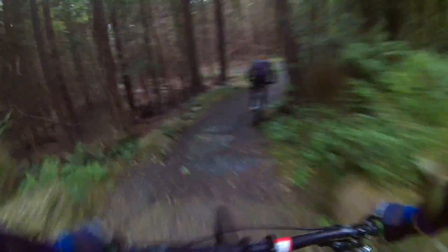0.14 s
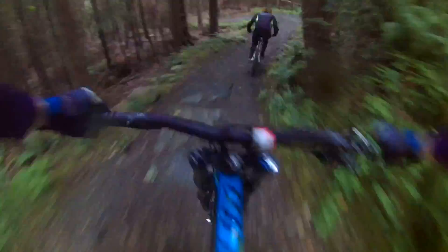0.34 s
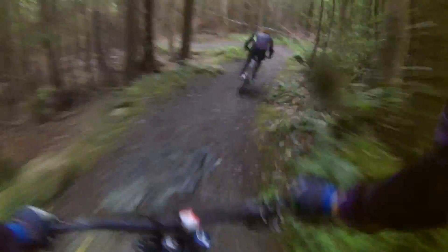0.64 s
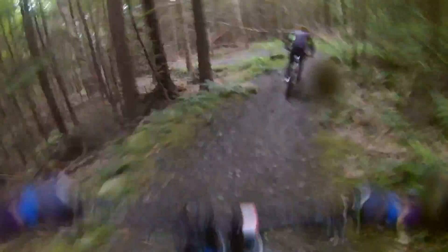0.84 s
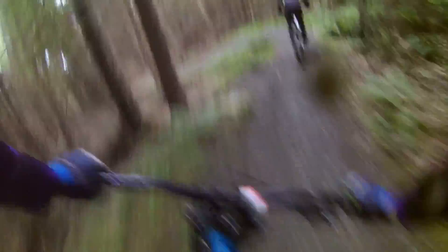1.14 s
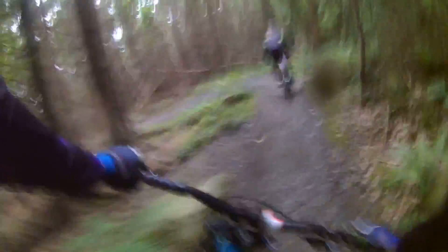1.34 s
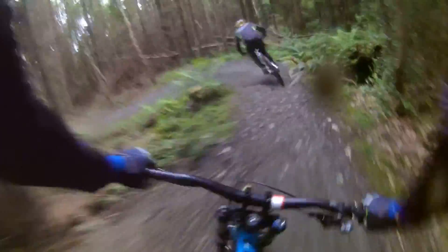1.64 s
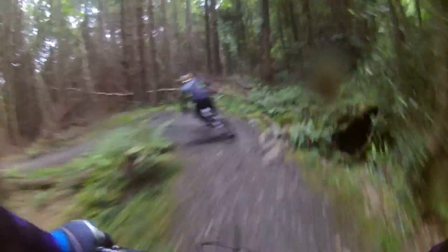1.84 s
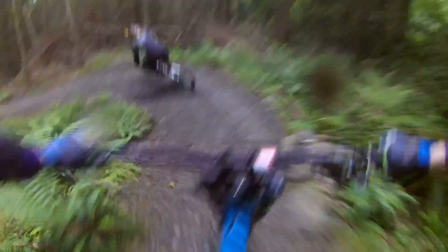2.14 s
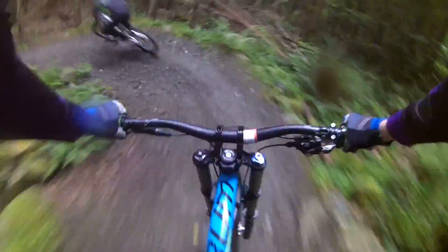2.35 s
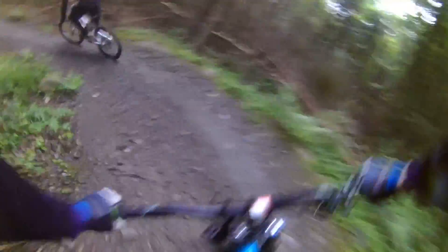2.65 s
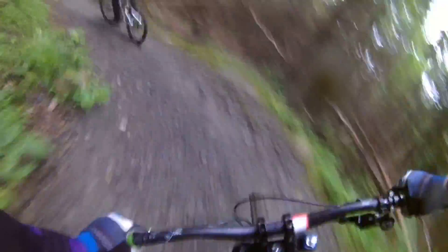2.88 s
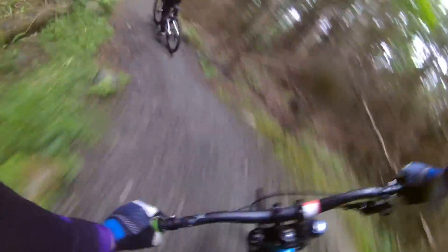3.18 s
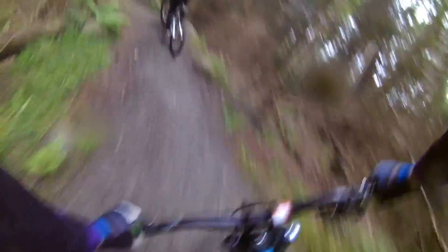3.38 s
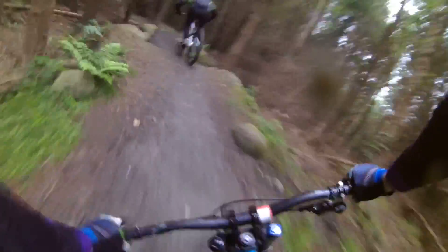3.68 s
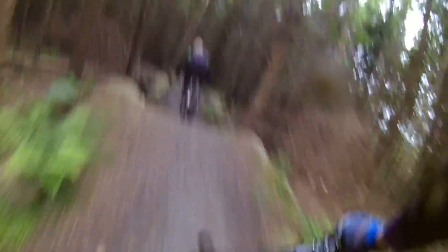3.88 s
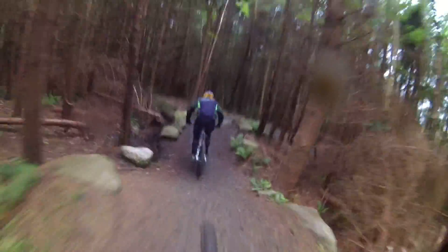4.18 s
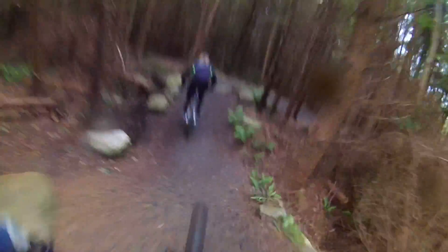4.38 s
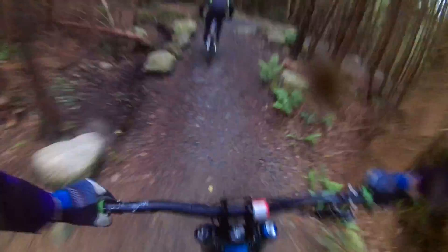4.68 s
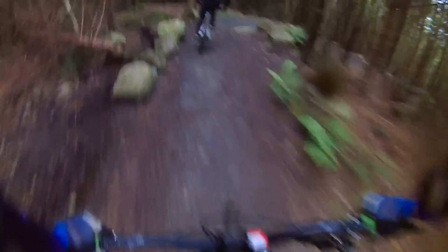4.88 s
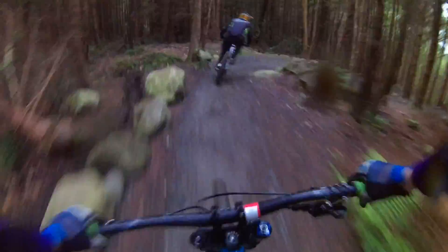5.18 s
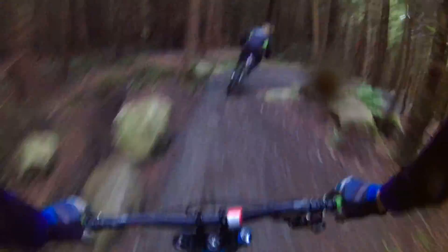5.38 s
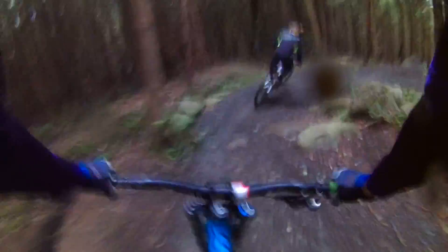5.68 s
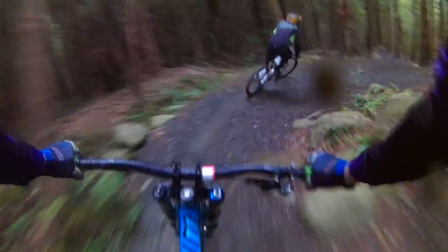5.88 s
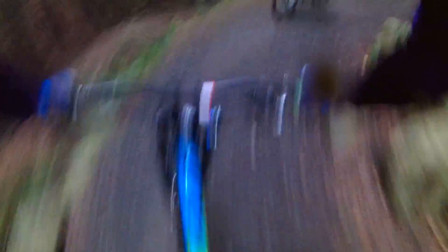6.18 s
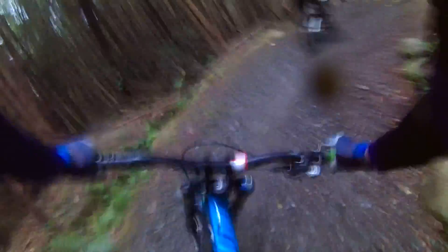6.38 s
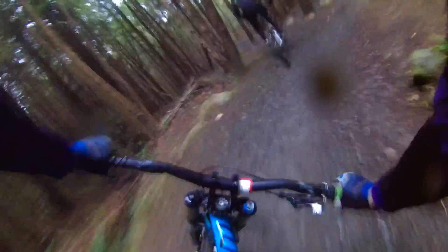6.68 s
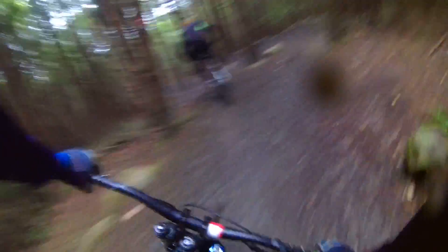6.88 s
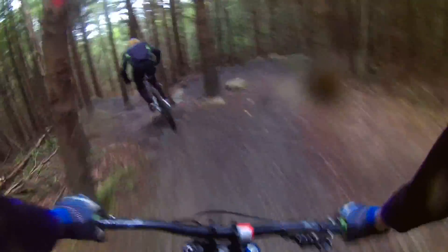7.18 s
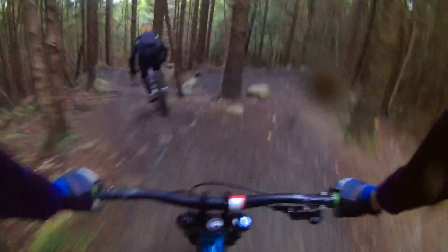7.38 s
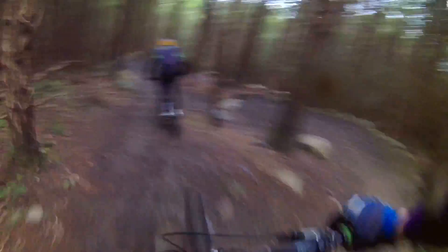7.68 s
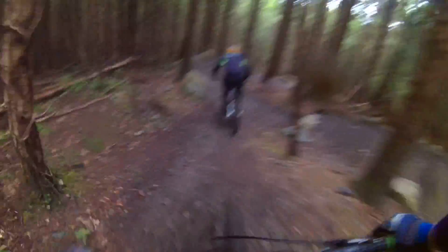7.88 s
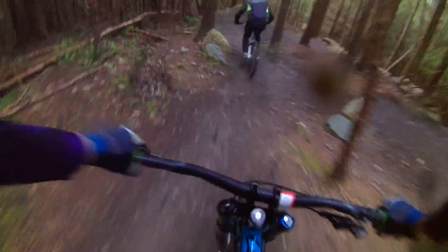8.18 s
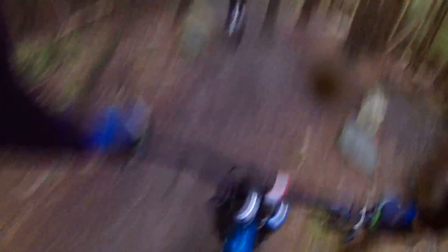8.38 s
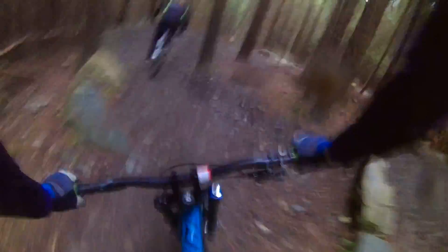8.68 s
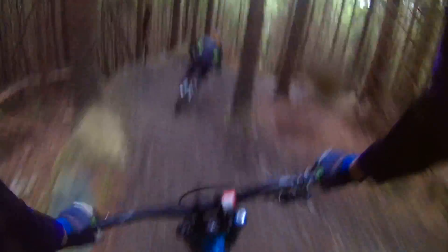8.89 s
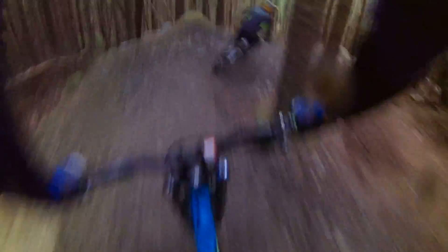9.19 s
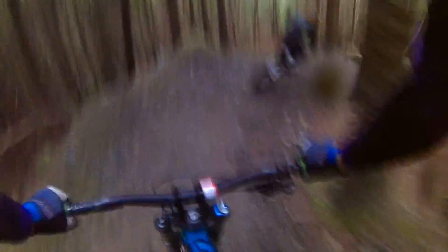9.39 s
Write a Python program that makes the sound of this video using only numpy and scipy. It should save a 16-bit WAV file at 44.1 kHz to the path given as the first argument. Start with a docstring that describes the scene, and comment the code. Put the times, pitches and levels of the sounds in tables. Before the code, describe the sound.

A mountain bike rattles down a rough woodland trail, with a huge early thump, clustered plastic knocks, low shaking rumble and muffled gritty tyre roar.

```python
"""A camera in a closed plastic housing rides on a mountain biker's chest down a rough woodland trail.
A short calm start breaks at 0.5 s in the hardest thump; knocks crowd up to 1.5 s, then thin out.
A second rough patch comes near 6 s, lone bumps after 8 s and a rattle of knocks at the end.
Throughout, filtered noise makes the rumble of shaking and a treble hiss that spits in short bursts, and
random grains make the tyre roar. The housing's resonances colour roar and knocks; sines add faint whines."""
import sys
import numpy as np
from scipy import signal
from scipy.fft import rfft, irfft, next_fast_len
from scipy.io import wavfile

SR = 44100
rng = np.random.default_rng(int(sys.argv[2]) if len(sys.argv) > 2 else 0)


def dump(signal):
    """Clip the signal to [-1, 1] and save it as 16-bit WAV at the path in sys.argv[1]."""
    limited = np.clip(np.atleast_2d(signal).T, -1, 1)
    pcm = np.round(limited * 32767).astype(np.int16)
    wavfile.write(sys.argv[1], SR, pcm)


N = 420846   # samples, about 9.5 s

# Resonances of the plastic housing: pitch_hz, width_hz (each source scales it), level_db
HOUSING_MODES = [(524, 510, -11.5), (904, 730, -11.5), (1241, 272, -4), (1487, 233, -5), (1880, 372, -6),
                 (2070, 1110, -16), (3000, 990, -21.5), (3733, 540, -7.5), (4730, 2600, -19.5),
                 (6400, 5000, -23), (11000, 2800, -35)]
RING_FROM_HZ, CRACK_FROM_HZ = 3200, 4500   # resonances below are "body", between "ring", above "crack"


def amp(db):
    """Decibels to gain."""
    return 10 ** (np.asarray(db) / 20)


def rms_one(x):
    """Scale to unit rms."""
    return x / np.sqrt(np.mean(x ** 2) + 1e-20)


def drift(rate_hz):
    """Slow random wandering, spread about 1: noise passed twice through a one-pole low-pass."""
    # made at an eighth of the sample rate; the first 8000 values let the filter settle
    r = np.exp(-16 * np.pi * rate_hz / SR)
    noise = rng.standard_normal(N // 8 + 8002)
    slow = signal.lfilter([1], [1, -2 * r, r * r], noise)[8000:]
    slow = rms_one(slow - slow.mean())
    return np.interp(np.arange(N) / 8, np.arange(len(slow)), slow)


def coloured(spectrum):
    """Noise shaped to the given (Hz, dB per Hz) curve, rms 1."""
    hz, db = np.transpose(spectrum)
    size = next_fast_len(N)
    grid_hz = np.maximum(np.arange(size // 2 + 1) * SR / size, 1)
    shape = amp(np.interp(np.log(grid_hz), np.log(hz), db, left=-120, right=-120))
    noise = irfft(rfft(rng.standard_normal(size)) * shape, size)
    return rms_one(noise[:N])


def resonate(x, hz, width_hz):
    """One resonance with gain 1 at its top: a two-pole filter that rings at its pitch."""
    r = np.exp(-np.pi * width_hz / SR)
    feed = np.array([1, 0, -1]) * (1 - r * r) / 2
    return signal.lfilter(feed, [1, -2 * r * np.cos(2 * np.pi * hz / SR), r * r], x)


def grains(per_s, spread_db):
    """Clicks at random moments, of uneven size and random sign."""
    sizes = amp(spread_db * np.minimum(rng.exponential(1, N), 4)) * rng.choice([-1, 1], N)
    return sizes * (rng.random(N) < per_s / SR)


def whines():
    """Faint tones of the electronics: sine waves whose pitch wavers a little."""
    # columns: pitch_hz, level_db (rms)
    whine_tones = [(13265, -88), (13348, -90), (14103, -90)]
    total = np.zeros(N)
    for hz, db in whine_tones:
        phase = 2 * np.pi * np.cumsum(hz + 7.5 * drift(23)) / SR
        total += amp(db) * np.sqrt(2) * np.sin(phase)
    return total


def hiss(level_db):
    """A treble noise floor with clumped bursts a few milliseconds long, some reaching lower than others."""
    # Colour of the hiss: pitch_hz, level_db (per Hz, shape only)
    hiss_spectrum = [(2650, -36), (4500, 1.5), (5740, -5.5), (6520, -5.5), (11300, -3), (15200, -2),
                     (16000, -8)]
    out = 0.46 * coloured(hiss_spectrum)
    clumps = amp(2.1 * drift(13.0))
    r = np.exp(-1 / (0.0012 * SR))   # each burst peaks after about 1.2 ms
    for edge_hz in (4000, 8000, 11500):
        starts = np.abs(grains(45 * clumps, 3.4))
        # the last factors give a burst the height of its start
        bursts = signal.lfilter([1], [1, -2 * r, r * r], starts + 1e-18) * (1 - r) * np.e
        high_pass = signal.butter(2, edge_hz, "high", fs=SR, output="sos")
        bright = signal.sosfilt(high_pass, coloured(hiss_spectrum))
        out = out + np.tanh(.5 * bursts) * 2.15 * bright   # tanh limits the largest bursts
    return amp(level_db) * rms_one(out)


def lurches(follows):
    """Power of the body's lurches over rough ground: each swells and sinks as a raised cosine."""
    # columns: middle_s, shaking_db (before follows narrows the spread), half_length_s
    lurch_rows = [(0.44, -29.5, 0.07), (0.515, -23.5, 0.061), (0.655, -22.5, 0.065), (0.758, -29, 0.12),
                  (0.874, -36.5, 0.055), (1.035, -41, 0.064), (1.146, -39.5, 0.11), (1.804, -47, 0.076),
                  (2.074, -45.5, 0.072), (2.41, -46, 0.08), (2.564, -41.5, .08), (2.874, -45, .1),
                  (3.165, -50, 0.059), (3.357, -46, 0.064), (3.694, -50, 0.088), (4.668, -46.5, 0.14),
                  (4.92, -46, 0.17), (5.197, -46, 0.13), (5.587, -38.5, 0.047), (5.926, -40, .08),
                  (6.0, -34.5, 0.094), (6.113, -34, 0.15), (6.24, -40.5, 0.19), (6.44, -44, 0.088),
                  (7.12, -50, 0.15), (7.405, -45.5, 0.12), (7.907, -47.5, 0.094), (8.3, -44, 0.083),
                  (8.587, -46, 0.079), (8.997, -39.5, 0.085), (9.17, -56, 0.11)]
    power = np.zeros(N)
    top_db = max(db for s, db, half_s in lurch_rows)
    for s, db, half_s in lurch_rows:
        first = max(round((s - half_s) * SR), 0)
        at = np.arange(first, min(round((s + half_s) * SR), N))
        swell = np.cos(np.pi / 2 * (at / SR - s) / half_s) ** 2
        # follows is the share of the level differences between lurches that is passed on
        power[at] += (amp(top_db + follows * (db - top_db)) * swell) ** 2
    return power


def rumble(shake_db, chest_db):
    """Low noise of the shaking mount and of strap and chest; shared lumps make both swell together."""
    # Colour of the slow shaking: pitch_hz, level_db (per Hz, shape only)
    shake_spectrum = [(7.1, -46), (12, 11.5), (54, 0), (130, -7.5), (170, -20), (290, -120)]
    # Colour of the strap and chest rumble: pitch_hz, level_db (per Hz, shape only)
    chest_spectrum = [(41, -60), (70, -21), (134, -4.5), (197, -1.5), (285, -9), (600, -19), (780, -42),
                      (1320, -120)]
    lumps = drift(4.3)
    shake = rms_one(coloured(shake_spectrum) * amp(1.74 * lumps + 1.5 * drift(11)))
    chest = rms_one(coloured(chest_spectrum) * amp(0.78 * lumps + 2.0 * drift(32)))
    return amp(shake_db) * shake + amp(chest_db) * chest


def tyres(roar_db, ring_db):
    """Tyre knobs and gravel: lumpy dense grains drive housing modes that each waver on their own."""
    lumps = amp(1.3 * drift(14.7) + 1.0 * drift(42))
    stones = grains(40, 2.84) * amp(5.5)   # lone stones tick over the dense grit
    grit_streams = [grains(3500, 1.6) * lumps + stones for stream in range(2)]
    low, high = np.zeros(N), np.zeros(N)
    for k, (hz, width_hz, db) in enumerate(HOUSING_MODES):
        mode = resonate(grit_streams[k % 2], hz, width_hz)   # two streams of grit alternate over the modes
        mode = resonate(mode, hz, 1.19 * width_hz)
        heard = amp(db + 2.24 * drift(33)) * mode * (-1) ** (k // 2)
        if hz < RING_FROM_HZ:
            low += heard
        else:
            high += heard
    return amp(roar_db) * rms_one(low) + amp(ring_db) * rms_one(high)


def small_knocks(roar_db):
    """Rows for knocks() at random moments; their peaks follow the tyre roar, so rough ground is louder."""
    per_s, most = 3.2, 60
    over_roar_db, spread_db = 6.5, 3   # peak against the tyre roar
    when, high = rng.random((most, 2)).T
    size, ring, crack, chatter = rng.standard_normal((most, 4)).T
    at = (when * N).astype(int)
    peak_db = roar_db[at] + over_roar_db + spread_db * size
    body_hz = 1100 * 2.45 ** high
    ring_db, crack_db = -14.5 + 9 * ring, -20.5 + 5 * crack
    length_s, chatter_db = np.full(most, 0.0089), 4.0 + 5 * chatter
    rows = np.transpose([at / SR, peak_db, body_hz, ring_db, crack_db, length_s, chatter_db])
    return list(rows[:int(np.clip(per_s * N / SR, 0, most))])


def knocks(rows):
    """Each knock is a click and a short chatter; where it lands decides which resonances answer."""
    out, t = np.zeros(N + 4096), np.arange(4096) / SR
    for s, peak_db, body_hz, ring_db, crack_db, length_s, chatter_db in rows:
        # fall per octave away from the body pitch: duller knocks are more pitched
        focus_db = min(-3.5 + 0.39 * ring_db, 0)
        fade = np.exp(-(t / np.clip(length_s, .0005, .04)) ** 0.96)
        chatter = rng.standard_normal(t.size) * fade * np.tanh(t / 0.0039)
        blow = amp(chatter_db) * chatter / np.linalg.norm(chatter)   # energy against that of the click
        blow[0] = 1   # the click
        whim_db = rng.normal(0, 1.0, len(HOUSING_MODES))   # each mode answers a little differently
        parts = np.zeros((3, t.size))   # body, ring, crack
        for k, (hz, width_hz, db) in enumerate(HOUSING_MODES):
            mode = amp(db + whim_db[k]) * (-1) ** k * resonate(blow, hz, width_hz)
            mode = resonate(mode, hz, 0.85 * width_hz)   # a second pass makes steep skirts
            if hz < RING_FROM_HZ:
                parts[0] += amp(focus_db * abs(np.log2(hz / body_hz))) * mode
            elif hz < CRACK_FROM_HZ:
                parts[1] += mode
            else:
                parts[2] += mode
        # bring the parts to equal energy, then mix them at their levels
        knock = amp([0, ring_db, crack_db]) / np.linalg.norm(parts, axis=1) @ parts
        at = round(s * SR)
        out[at:at + t.size] += amp(peak_db) * knock / np.abs(knock).max()
    return out[:N]


def thumps():
    """A bump shoves the microphone: a rounded push, then both mount modes swing out, heavily damped."""
    # Bumps through the mount: start_s, peak_db, quick_db (quick mode against slow mode),
    # t60_s (base time of a 60 dB fade; the slow mode fades faster, the quick one slower)
    bump_rows = [(0.429, -29, -1, 0.087), (0.5, -7, -9.5, 0.071), (0.601, -28.5, 9, 0.045),
                 (0.643, -30, 1, 0.062), (0.676, -13.5, -13, 0.041), (0.75, -30, 6, 0.057),
                 (0.764, -25.5, 6, 0.093), (0.854, -22.5, 6, 0.027), (1.16, -31.5, 5, 0.036),
                 (1.227, -32, 12, 0.021), (1.511, -36.5, 13, 0.057), (2.078, -35, -30, 0.047),
                 (2.407, -38.5, -7, 0.035), (2.483, -46, -5, 0.065), (2.616, -22, -0.5, 0.077),
                 (3.341, -37, -17, 0.08), (3.525, -28, -9.5, 0.08), (3.968, -40.5, -15, 0.082),
                 (4.969, -36.5, -11, 0.084), (5.91, -33, -23, 0.11), (5.979, -22, 9, 0.018),
                 (5.993, -34, -15, 0.035), (6.114, -22.5, -5.5, 0.045), (6.166, -40, -4, 0.038),
                 (6.285, -36.5, 8, 0.13), (6.415, -35, 4, 0.036), (6.685, -41, 1, 0.045),
                 (6.754, -44, -14, 0.04), (6.804, -41, -24, 0.064), (7.375, -50, -15, 0.03),
                 (7.608, -34, -16, 0.0098), (7.848, -34.5, -5, 0.038), (8.194, -33.5, -3, 0.02),
                 (8.282, -44, 4, 0.039), (8.413, -21, 1, 0.037), (8.806, -28.5, 9, 0.024),
                 (8.986, -17.5, -8.5, 0.044), (9.127, -31.5, -6, 0.031)]
    slow_hz, quick_hz = 67.4, 183   # the two modes of the mount
    out, t = np.zeros(N + 4096), np.arange(4096) / SR
    slow = np.cos(2 * np.pi * slow_hz * t - .8)
    quick = np.sin(2 * np.pi * quick_hz * t)
    # the lowest housing mode answers
    answer = amp(-16.0 - 60 * t / 0.019) * np.sin(2 * np.pi * HOUSING_MODES[0][0] * t)
    for s, peak_db, quick_db, t60_s in bump_rows:
        fade_db = -60 * t / np.clip(t60_s, .008, .2)
        swing = slow * amp(1.36 * fade_db) + quick * amp(quick_db + 0.77 * fade_db)
        swing = swing * np.tanh(t / 0.0023) + answer   # tanh rounds the push
        at = round(s * SR)
        out[at:at + t.size] += amp(peak_db) * swing / np.abs(swing).max()
    return out[:N]


def add_power(level_db, power):
    """Raise a level in dB by extra power, as independent sounds add up."""
    return 10 * np.log10(amp(level_db) ** 2 + power)


def scene():
    """All layers add up at the one microphone."""
    # The ride's levels, joined by straight lines: time_s, shake_db (slow shaking),
    # chest_db (strap and chest rumble), roar_db (tyres), hiss_db (treble hiss);
    # the first three levels are raised further below
    ride_levels = [(0.0, -54.5, -59, -54.5, -75), (0.42, -51.5, -54.5, -56.5, -64),
                   (0.64, -38, -46.5, -47.5, -68), (0.9, -46, -54, -53.5, -65.5),
                   (1.35, -49, -57.5, -57.5, -64.5), (2.15, -52.5, -58.5, -55, -65.5),
                   (2.55, -38.5, -58.5, -53, -63), (2.95, -50.5, -57.5, -57, -64),
                   (3.48, -48, -62.5, -60, -64), (4.06, -51, -59.5, -61, -67.5),
                   (4.7, -51, -61.5, -59, -66), (5.31, -55, -57.5, -58.5, -65),
                   (5.92, -41, -59.5, -57, -63.5), (6.16, -50, -51.5, -54, -64),
                   (6.54, -49, -57, -60.5, -69.5), (7.12, -55.5, -59.5, -56.5, -66),
                   (7.57, -46, -52.5, -55, -67.5), (7.97, -51, -61, -59.5, -68),
                   (8.37, -42.5, -54, -55, -67.5), (8.87, -47, -60.5, -58.5, -69),
                   (9.19, -45, -54, -53.5, -65.5), (9.54, -49, -58, -52, -68)]
    # Knocks and rattles on the housing: start_s, peak_db, body_hz, ring_db (near 4 kHz, against the body),
    # crack_db (above 4.5 kHz, against the body), rattle_s (fade time), rattle_db (against the click)
    knock_rows = [(0.369, -36, 1520, -2, -26, 0.012, 3.5), (0.384, -27.5, 1270, -7, -13, 0.0078, -5),
                  (0.445, -41, 1400, 15, -22, 0.0051, 1), (0.493, -30.5, 1520, -17, -30, 0.0068, 0),
                  (0.5, -12, 577, -27, -35.5, 0.0058, -9.5), (0.613, -15.5, 2030, -15.5, -14, 0.002, -12),
                  (0.647, -32.5, 1870, -13, -17, 0.016, 6.5), (0.68, -34, 1220, -14, -20, .0065, 8),
                  (0.714, -33, 1720, -20, -20, .008, 7), (0.73, -28, 1850, -6, -11, 0.0096, 5),
                  (0.789, -29.5, 1180, -33, -33, 0.0053, -7), (0.844, -43, 1490, -25, -19, .009, 6),
                  (0.888, -25.5, 1270, -36, -38, 0.0084, 13), (0.893, -19.5, 1220, -30, -35, 0.0081, 1),
                  (0.901, -30, 1270, -29, -36, .0046, 0), (1.014, -32, 1310, -42, -35, 0.0048, 4),
                  (1.026, -23, 1190, -21, -36, 0.0089, 0), (1.035, -20, 1160, -36, -37, 0.0079, -9),
                  (1.145, -37.5, 1270, -23, -19, 0.0086, 6), (1.206, -41.5, 1490, -22, -25, .008, 6),
                  (1.269, -26, 2410, -8, 4, 0.002, 4), (1.42, -42.5, 1230, -20, -13, 0.005, 1),
                  (1.524, -37, 1200, -3, -7.5, .0064, -3.5), (2.035, -35.5, 1330, -6, -13, 0.033, 16),
                  (2.139, -22, 1570, -12.5, -17, 0.002, -1.5), (2.175, -33, 1230, -15, -30, .007, -2),
                  (2.238, -24, 2370, -19.5, -38, 0.0015, 1), (2.27, -33.5, 1210, -22, -23, 0.0088, 0.5),
                  (2.544, -39.5, 1850, -28, -15, 0.0061, 5), (2.973, -37, 1100, -53, -26, 0.0043, -13),
                  (3.002, -33.5, 1080, -28, -21, 0.0068, 0), (4.352, -47.5, 1840, -11, -11, .011, 20),
                  (4.544, -45.5, 1840, -21, -17, .007, 18), (4.84, -42, 1240, -13, -19, 0.01, 10),
                  (5.254, -38, 2240, 1.5, -34, .006, 7), (5.283, -49, 1090, 3, -11, 0.006, 4),
                  (5.311, -47, 1980, 7, -13, .0063, 4), (5.353, -43, 1110, 1, -29, .0096, 8),
                  (5.363, -36.5, 1520, -2.5, -10, .009, 10), (5.439, -44.5, 1220, 1, -1, 0.035, 8),
                  (5.482, -44, 1380, -4, -15, .007, -1), (5.869, -41, 1180, -14, -21, 0.0079, -7),
                  (5.888, -37, 1400, -8, -15, 0.0043, 3), (5.98, -23.5, 1340, -18, -32, 0.0035, -2.5),
                  (6.019, -38, 745, -41, -27, 0.0097, 3.5), (6.085, -42, 1280, -19, -14, .007, 4),
                  (6.097, -32, 1770, -15, -33, 0.0063, -4), (6.132, -35, 1460, 8, -5, 0.0027, 7),
                  (6.191, -30.5, 1080, -11, -24, 0.0088, 7), (6.262, -39, 1850, -13, -17, 0.017, 6.5),
                  (6.288, -35, 1920, -24, 4, 0.0084, 1), (6.344, -33, 1200, -10, -14, .0045, -3),
                  (6.393, -38.5, 1490, -33, -27, 0.0051, -13), (7.315, -37.5, 1280, -22, -32, .007, -2),
                  (7.425, -31.5, 1200, -37, -36, .009, -4.5), (7.492, -40.5, 1210, -32, -25, .007, 4),
                  (7.609, -27.5, 1140, -46, -27, 0.012, -9), (7.921, -43, 1840, -8, -12, 0.011, 5),
                  (8.304, -42.5, 1640, 1, -11, .008, 0), (8.389, -41, 1160, -7, -23, 0.0076, 14),
                  (8.425, -38, 1210, -3, -12, 0.0067, 8), (8.597, -38.5, 1320, -20, -19, 0.0074, 2),
                  (9.018, -37.5, 1160, -20, -16, 0.0054, 2), (9.123, -41, 1140, -20, -15, 0.012, 9),
                  (9.17, -38, 1210, -22, -24, 0.0094, 3), (9.21, -26, 1230, -39, -39, 0.012, 4),
                  (9.229, -34.5, 1220, -23, -27, 0.0084, 3), (9.253, -23.5, 1210, -27, -32, 0.016, 0),
                  (9.274, -33.5, 1230, -14, -26, 0.011, 5), (9.304, -32, 1170, -16, -28, 0.012, 2),
                  (9.369, -35.5, 1120, -32, -32, .007, 0), (9.472, -32, 1230, -25, -29, 0.016, 7.5)]
    s, *columns = np.transpose(ride_levels)
    shake_db, chest_db, roar_db, hiss_db = [np.interp(np.arange(N) / SR, s, c) for c in columns]
    shake_db = add_power(shake_db, lurches(0.95))
    # strap rumble and tyre roar swell a little at the same moments as the lurches
    lurch_swell = lurches(0.81)
    chest_db = add_power(chest_db, amp(-21) ** 2 * lurch_swell)
    roar_db = add_power(roar_db, amp(-27.5) ** 2 * lurch_swell)
    # upper ring of the roar: -66 dB at mean roar, passing on 0.9 of the roar's swing
    ring_db = -66 + 0.9 * (roar_db - roar_db.mean())
    steady = whines() + hiss(hiss_db) + rumble(shake_db, chest_db) + tyres(roar_db, ring_db)
    all_knocks = knocks(list(knock_rows) + small_knocks(roar_db))
    return (steady + all_knocks + thumps())[None]


def record(dry):
    """The lowest bass is blocked by a gentle high-pass and the top is cut by a steep low-pass."""
    bass_block = signal.butter(1, 18, "high", fs=SR, output="sos")
    top_cut = signal.ellip(10, .5, 60, 15880, fs=SR, output="sos")   # .5 dB ripple, 60 dB down above
    return signal.sosfilt(top_cut, signal.sosfilt(bass_block, dry))


dry = scene()
out = record(dry)
dump(out)
```